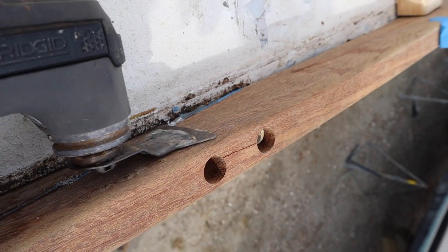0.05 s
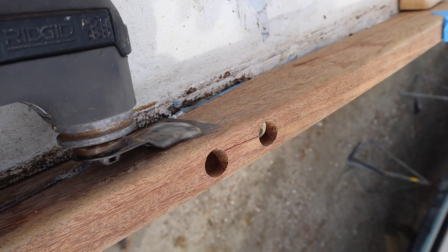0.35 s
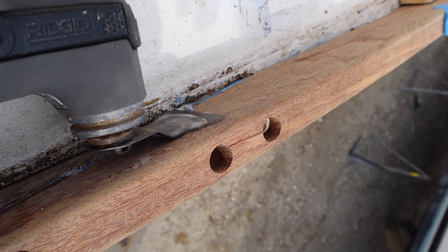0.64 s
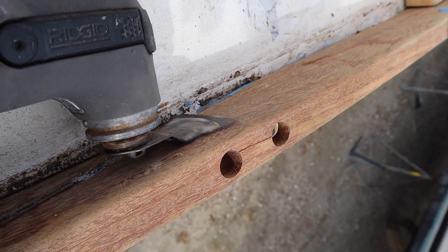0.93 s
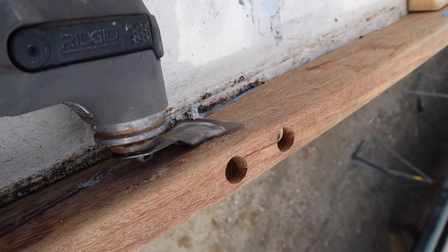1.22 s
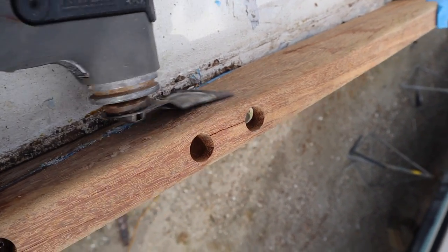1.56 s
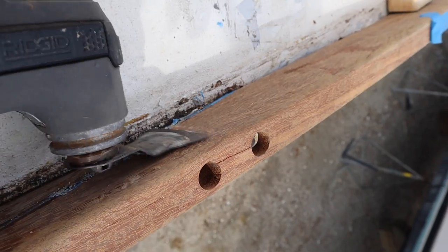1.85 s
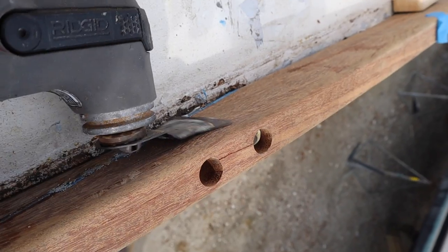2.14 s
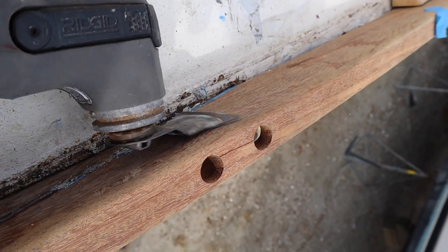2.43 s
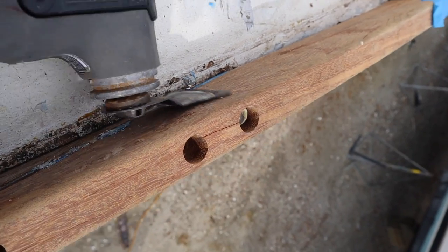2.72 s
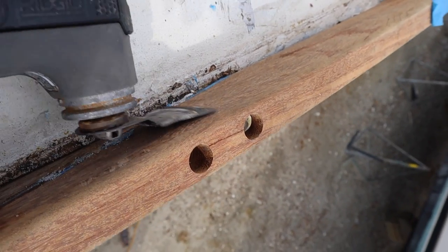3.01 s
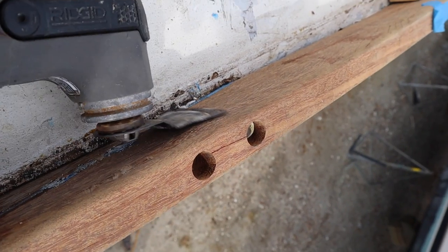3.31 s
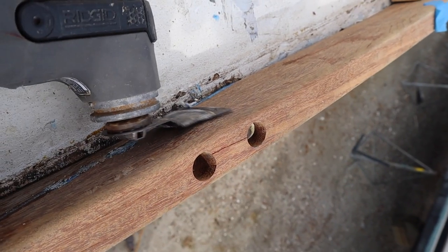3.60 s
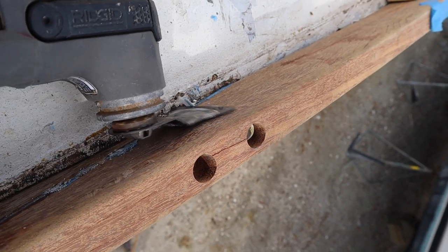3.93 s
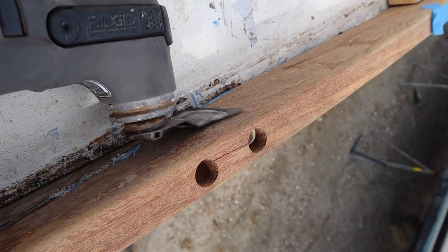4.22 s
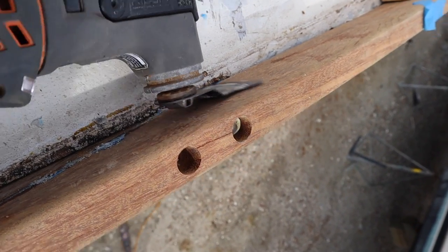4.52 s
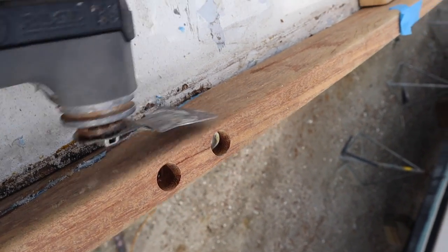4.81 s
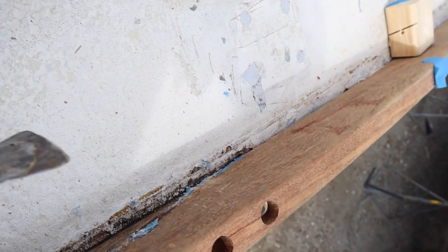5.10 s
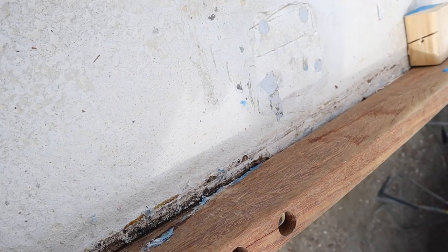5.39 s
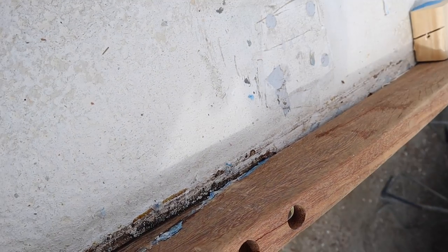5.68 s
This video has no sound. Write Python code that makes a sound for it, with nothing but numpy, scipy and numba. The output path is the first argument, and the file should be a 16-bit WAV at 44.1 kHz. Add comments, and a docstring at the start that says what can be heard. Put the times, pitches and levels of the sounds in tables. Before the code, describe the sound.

An oscillating multi-tool is heard close up in a shed, its steel blade scraping hard epoxy from a wooden rail. It begins winding down with a rattle, then spins back up at about 0.3 seconds into a harsh, steady buzz, with bright chatter, gritty rasp and a boom from the wood. The pitch sags slightly under pressure. Light slaps come around 1.6 seconds. At 1.8 the motor runs down, restarting just after 2. Near 2.6 the edge snags with a brief squeal, followed by several hard slaps. The pitch dips briefly around 3.1 with another slap, then the scraping continues, rattling harder around 4.4 and slapping again at 4.6. At 4.7 the blade lifts clear and the motor coasts down, stopping by about 5.1. The steel rings on thinly and fades over a very faint rumble and electrical hum.

```python
"""In a boat shed, close by, an oscillating multi-tool scrapes hard epoxy off a wooden rail.
The motor runs down and restarts twice; its drive buzzes, and the steel blade knocks and rasps at
every reversal, booming through the rail. The blade slaps the wood, and once it snags and squeals.
At the end it is lifted clear, the motor coasts to a stop and the steel rings on over a faint mains hum."""
import sys
import numpy as np
from scipy import signal
from scipy.fft import rfft, irfft, next_fast_len
from scipy.io import wavfile
from scipy.ndimage import uniform_filter1d
from numba import njit

SR = 44100
rng = np.random.default_rng(int(sys.argv[2]) if len(sys.argv) > 2 else 0)


def pcm_store(signal):
    """Save signal as 16-bit PCM."""
    levels = np.round(np.clip(np.atleast_2d(signal), -1, 1) * 32767)
    wavfile.write(sys.argv[1], SR, levels.astype(np.int16).T)


N = 253565
T = np.arange(N) / SR

# How hard the hand leans on the tool: time_s, push (0-1)
HAND_PUSH = [(.62, 0.95), (.67, 0.28), (.744, 0.38), (1.1, 0.97), (1.334, 0.99), (1.412, 0.06),
             (1.63, 0.43), (1.78, 0.04), (2.25, 0.68), (2.54, 0.97), (2.64, 0.24), (2.8, 0.6), (2.92, 0),
             (3.25, 0.37), (3.49, 0.91), (4.35, 0.92), (4.44, 0.31), (4.67, 0.06)]
# Spells when the blade sits badly and bounces on every other stroke:
# start_s, end_s, looseness (0-1), bounce_db
LOOSE_SPELLS = [(-.05, .43, 0.42, -11), (.63, .72, 0.4, -24.5), (1.36, 1.52, 0.45, -14.5),
                (1.52, 1.64, 0.11, -6.5), (1.64, 2.23, 0.32, -29), (2.69, 2.8, .42, -9.5),
                (2.8, 3.4, 0.15, -19), (3.95, 4.38, 0.08, -9.5), (4.38, 4.53, 0.36, -1.5),
                (4.53, 4.82, 0.17, -10), (4.82, 5.2, 0.4, -8)]
def multi_tool():
    """The running tool: tonal while the blade sits firmly, rattly when it is loose or the motor slow."""
    push, = in_time(HAND_PUSH)
    speed_hz = motor_speed(push)
    push = push * np.interp(speed_hz, [235, 268], [0, 1])  # the push only counts near full speed
    loose, bounce_db = held(LOOSE_SPELLS, rest=(.052, -18))
    bend_hz, lift_db = blade_bend()
    rail_db, housing_db, chatter_db, rasp_db, crumbs_db, shake_db = part_levels(
        speed_hz, push, loose, bounce_db, lift_db)
    turns = np.cumsum(speed_hz * (1 + .0011 * drift(30))) / SR  # strokes so far
    pressure = np.interp(push, [.2, .8], [0, 1])
    drive = (turns, pressure, bounce_db)
    pace = np.clip(speed_hz / 272, 0, 1)
    firm = np.clip(1 - loose, .01, .99)
    rail = rail_boom(*drive, loose, tonal=firm ** 1.3 * pace ** 2.5)
    housing = housing_buzz(*drive, tonal=firm * pace ** 1.6)
    chatter = blade_chatter(*drive, bend_hz, lift_db, tonal=.9 * firm ** 1.8 * pace ** 10)
    rasp, edge_hits = edge_rasp(*drive, tonal=.42 * firm ** 3 * pace ** 8)
    crumbs = epoxy_crumbs(*drive)
    top_end = blend(blade_zing(edge_hits), crumbs, .3 * lifted_share())
    growl = rail_growl(turns, bounce_db)
    shake = np.sin(2 * np.pi * turns)  # the whole tool shakes at the stroke rate
    sound = (from_db(rail_db) * (rail + growl) + from_db(housing_db) * housing
             + from_db(chatter_db) * chatter + from_db(rasp_db) * rasp
             + from_db(crumbs_db) * top_end + from_db(shake_db) * shake)
    return sound * np.interp(T, [5.06, 5.11], [1, 0])


FREE_HZ, SAG_HZ = 285.3, 10.2  # stroke rate with no load, and its drop under a full push
# The trigger is let go and pulled again: off_s, on_s, spin_up_s
TRIGGER_PAUSES = [(-0.06, 0.337, .113), (1.797, 2.055, .17)]
# The trigger is eased for a moment: middle_s, length_s, drop_hz
TRIGGER_EASING = [(3.12, .21, 35)]
def motor_speed(push, last_off_s=4.709):
    """Strokes per second: the motor sags under the push, coasts off the trigger and spins up again."""
    powered = FREE_HZ - SAG_HZ * push - swells(TRIGGER_EASING)
    speed = np.minimum(powered, coasting(T - last_off_s))
    for off, on, spin_up in TRIGGER_PAUSES:
        missing = np.maximum(powered - coasting(np.minimum(T, on) - off), 0)
        speed = speed - missing * np.clip(1 - (T - on) / spin_up, 0, 1) ** 1.6
    return np.maximum(speed, 1)


def coasting(elapsed_s, drag_per_s=2.6, friction_hz_per_s=330):
    """Stroke rate of the unpowered motor, slowed by drag and friction."""
    offset = friction_hz_per_s / drag_per_s
    return np.maximum((FREE_HZ + offset) * np.exp(-drag_per_s * np.maximum(elapsed_s, 0)) - offset, 1)


# Drive timbre, pressed on the work and running light: harmonic, level_db
PRESSED_TIMBRE = [(1, -10), (2, 1.5), (3, 7.5), (4, -8.5), (5, -9.5), (6, -10.5), (7, -1.5), (8, -5),
                  (9, -3), (10, -4.5), (11, -7), (12, -7.5), (13, -1), (14, -6), (15, -1), (16, -7.5),
                  (17, -3), (18, -9), (19, -6.5), (20, -4), (21, -4.5), (22, -10.5), (23, -9.5), (24, -14),
                  (25, -11.5), (26, -7), (27, -29.5), (28, -15.5), (29, -15.5), (30, -4.5), (31, -7),
                  (32, -3.5)]
LIGHT_TIMBRE = [(1, -19), (2, 2.5), (3, 6.5), (4, 3), (5, -3.5), (6, 1.5), (7, 4.5), (8, 3), (9, 0),
                (10, 7.5), (11, -2.5), (12, -3), (13, -6.5), (14, -3), (15, -7), (16, -9.5), (17, -10.5),
                (18, -15), (19, -6.5), (20, -14), (21, -12.5), (22, -9.5), (23, -21), (24, -14.5),
                (25, -12.5), (26, -4.5), (27, -2.5), (28, -5.5), (29, -9.5), (30, -19), (31, -8.5),
                (32, -19.5)]
def drive_buzz(turns, pressure, bounce_db, harmonics, waver_db, scatter):
    """Stroke harmonics: pressure scatters their phases, and the changing bite flutters the high ones."""
    out, power = 0, 0
    for k in harmonics:
        pressed_db = np.interp(k, *np.transpose(PRESSED_TIMBRE))
        light_db = np.interp(k, *np.transpose(LIGHT_TIMBRE))
        flutter = min(k / 16, 1)
        gain = from_db(light_db + pressure * (pressed_db - light_db) + waver_db * drift(1.53))
        smear = scatter * (1 + pressure) / 2 * drift(.6)
        angle = 2 * np.pi * k * turns + smear + .45 * flutter * drift(10)
        # bouncing on every other stroke adds tones between the harmonics
        between = from_db(bounce_db) * k / (k + 5) * np.cos(angle + np.pi * turns + .5 * drift(5))
        power += gain ** 2 / 2
        out -= gain * from_db(flutter * (2.8 * drift(11) - .9)) * (np.cos(angle) + between)
    return out / np.sqrt(power)


def blade_hits(turns, jitter_s, spread_db, return_db, grit_db, decay_s, slide_db):
    """The blade knocks at both ends of its swing, grinds briefly after each hit and slides between."""
    reversals = np.arange(1, int(2 * turns[-1]))
    chance = rng.standard_normal((4000, 2))[:len(reversals)]
    times = np.interp(reversals / 2, turns, T) + jitter_s * chance[:, 0]
    hits = clicks(times, from_db(spread_db * chance[:, 1] + return_db * (reversals % 2)))
    grind = from_db(grit_db) * friction(hits, decay_s)
    return evened(grind - hits) + from_db(slide_db) * rng.standard_normal(N)


# Colour of the steel blade: frequency_hz, gain_db
BLADE_COLOUR = [(2300, -52.5), (3100, -10.5), (3700, -7.5), (4400, -7.5), (5100, -7), (5900, -7.5),
                (6600, -21), (7400, -8.5), (9000, -48)]
def blade_chatter(turns, pressure, bounce_db, bend_hz, lift_db, tonal):
    """Bright steel chatter, boosted around the blade's bending resonance."""
    tone = drive_buzz(turns, pressure, bounce_db + 3, range(12, 25), waver_db=1.6, scatter=1.3)
    hits = blade_hits(turns, 1.8e-5, spread_db=3, return_db=-5, grit_db=-1, decay_s=.001, slide_db=-3)
    chatter = blend(tone, evened(body(hits, BLADE_COLOUR)), tonal)
    return bending(chatter, bend_hz * (1 + .012 * drift(22)), width_hz=240, lift_db=lift_db)


# The blade's bending resonance: start_s, pitch_hz, lift_db
BEND_STEPS = [(0, 4340, 2.5), (.74, 4440, 6.5), (1.18, 3600, -10.5), (1.37, 4580, -3), (1.53, 5760, 2.5),
              (1.62, 5200, 1), (1.7, 4880, 6.5), (1.83, 4830, 5.5), (2.14, 4400, 0), (2.5, 4100, -5.5),
              (2.82, 5228, 0), (3.45, 3904, -4.5), (4.67, 5084, 2)]
def blade_bend():
    """Pitch and lift of the resonance, which jumps with each new point of contact."""
    return held([(start, np.inf, hz, db) for start, hz, db in BEND_STEPS], rest=BEND_STEPS[0][1:])


# Colour of the gear housing: frequency_hz, gain_db
HOUSING_COLOUR = [(800, -25), (1100, 4), (1500, 2), (2000, 4), (2600, 2.5), (3150, -4), (3900, -22.5)]
def housing_buzz(turns, pressure, bounce_db, tonal):
    """The gear housing fills the midrange with buzz and rattle."""
    tone = drive_buzz(turns, pressure, bounce_db + 1, range(4, 12), waver_db=1.2, scatter=1.1)
    hits = blade_hits(turns, 3.5e-5, spread_db=3, return_db=-7, grit_db=-3, decay_s=.0012, slide_db=-8)
    return blend(tone, evened(body(hits, HOUSING_COLOUR)), tonal)


# Colour of the cutting edge: frequency_hz, gain_db
EDGE_COLOUR = [(5800, -9.5), (6900, -11.5), (7700, -5.5), (8350, 0), (8900, -6), (9500, -10.5),
               (10300, -24.5), (12000, -50)]
def edge_rasp(turns, pressure, bounce_db, tonal):
    """The edge scrapes the epoxy: returns the gritty treble rasp and the raw hits behind it."""
    tone = drive_buzz(turns, pressure, bounce_db + 3.5, range(25, 33), waver_db=6, scatter=1.25)
    hits = blade_hits(turns, 1.5e-5, spread_db=3.2, return_db=-5, grit_db=3, decay_s=.0009, slide_db=-4)
    return blend(evened(body(tone, EDGE_COLOUR)), evened(body(hits, EDGE_COLOUR)), tonal), hits


# Colour of the wooden rail: frequency_hz, gain_db
RAIL_COLOUR = [(150, -19), (330, -16.5), (520, -10), (780, 2.5), (950, 1.5), (1200, -8.5)]
def rail_boom(turns, pressure, bounce_db, loose, tonal):
    """The rail booms with the low harmonics and knocks; a bearing hums off the harmonic series."""
    bearing = from_db(-17) * np.sin(2 * np.pi * 2.58 * turns + drift(12))
    tone = drive_buzz(turns, pressure, bounce_db - 3.5, range(2, 4), waver_db=.7, scatter=.21)
    hits = blade_hits(turns, 9e-5, spread_db=3.5, return_db=-5, grit_db=1, decay_s=.0012, slide_db=-4)
    wobble = from_db(4 * loose * drift(25))
    return blend(tone + bearing, evened(body(hits, RAIL_COLOUR)), tonal) * wobble


def rail_growl(turns, bounce_db):
    """Bouncing on every other stroke rocks the rail an octave down."""
    gain = from_db(bounce_db - 20 + 3 * drift(12))
    sub_octave = np.sin(np.pi * turns + .5 * drift(15))
    overtone = 1.7 * np.sin(3 * np.pi * turns + .5 * drift(15))
    return gain * (sub_octave + overtone)


# Colour of the chipping epoxy: frequency_hz, gain_db
CRUMB_COLOUR = [(5760, -25), (9800, -3.5), (10400, -5.5), (11200, -3.5), (12400, -3), (13500, 1),
                (15500, -6.5)]
def epoxy_crumbs(turns, pressure, bounce_db):
    """Epoxy crumbles in a fine sizzle; hard bouncing and pressure wake a high mode of the blade."""
    grit = blade_hits(turns, 3e-5, spread_db=4, return_db=-4, grit_db=5, decay_s=.0008, slide_db=-3)
    sizzle = evened(body(grit, CRUMB_COLOUR))
    mode_hz = 11300 * (1 + .004 * drift(10))
    return bending(sizzle, mode_hz, width_hz=260, lift_db=1.4 * bounce_db + 12.5 + 8.3 * pressure)


# High modes of the lifted blade: pitch_hz, level_db
ZING_MODES = [(8200, -12), (12200, 2.5), (15050, -8)]
def blade_zing(hits):
    """The rattle excites narrow, glassy resonances in the steel."""
    return sum(from_db(db) * evened(signal.lfilter(*signal.iirpeak(hz, hz / 60, fs=SR), hits))
               for hz, db in ZING_MODES)


# How strongly the blade works against the epoxy: time_s, level_db
EFFORT_CURVE = [(.27, -1.5), (.37, 1), (.55, 0.5), (.65, -0.5), (1.0, .5), (1.25, 0.5), (1.55, 1.5),
                (1.67, 0.5), (2.03, 2), (2.13, 1), (2.45, 0.9), (2.85, 0), (3.4, -2.5), (3.88, 0),
                (4.25, 0), (4.36, -1), (4.57, 0), (5.0, -4)]
# The edge digs in and the rasp flares: middle_s, length_s, boost_db
EDGE_DIGS = [(.018, 0.069, 11.5), (.11, 0.051, 8.5), (.54, 0.22, 2), (.66, 0.14, 2.5), (.98, 0.17, 7),
             (1.77, 0.16, 5), (2.32, 0.38, 4), (3.03, .15, 8), (3.1, 0.058, 10), (3.26, 0.12, 4.5),
             (4.22, 0.18, 1.5), (4.5, .14, 6.5)]
# The blade skids off the wood and the boom thins: middle_s, length_s, cut_db
BLADE_SKIDS = [(.75, 0.074, 7), (1.2, 0.049, 1.5), (1.65, 0.14, 5.5), (1.83, 0.097, 5), (2.12, 0.15, 2.5),
               (2.24, 0.059, 6), (2.55, 0.047, 5.5), (2.85, 0.31, 4), (3.11, 0.23, 4.5),
               (3.225, 0.043, 4.5)]
# The blade jumps back and the whole tool ducks: middle_s, length_s, cut_db
BLADE_RECOILS = [(.185, 0.05, 1.5), (.625, 0.022, 3.5), (1.25, 0.23, 1), (2.68, 0.032, 11.5),
                 (2.714, 0.028, 5), (2.84, .12, 2.5)]
# Mix of each part: free_speed_db, tenfold_slowing_cut_db, full_push_db, full_bounce_db,
# lifted_db, effort_share
RAIL_MIX = (-30.5, 30, 2.5, 5.5, -9, 1)
HOUSING_MIX = (-26, 29, 0.5, 7, 3, 1.55)
CHATTER_MIX = (-21, 40, 1.12, 2, 1.5, 1.5)
RASP_MIX = (-27, 41.5, 2, 2.5, 1, 1.16)
CRUMBS_MIX = (-30.5, 45, -2.5, 1.5, 2.5, 1.5)
SHAKE_MIX = (-49, 22.5, 15, 1, 9, .6)
def part_levels(speed_hz, push, loose, bounce_db, lift_db):
    """Faders in dB for the six parts, riding on speed, push, bounce, effort and the uneven epoxy."""
    effort_db, = in_time(EFFORT_CURVE)
    knocking = np.interp(speed_hz, [26.2, 73], [.03, 1])  # a slow blade barely knocks
    shared_db = 20 * np.log10(knocking) - swells(BLADE_RECOILS)
    decades, bounce, lifted = np.log10(speed_hz / FREE_HZ), from_db(bounce_db), lifted_share()
    rail, housing, chatter, rasp, crumbs, shake = (
        shared_db + db + slowing_db * decades + push_db * push + bouncing_db * bounce
        + lifted_db * lifted + share * effort_db
        for db, slowing_db, push_db, bouncing_db, lifted_db, share
        in (RAIL_MIX, HOUSING_MIX, CHATTER_MIX, RASP_MIX, CRUMBS_MIX, SHAKE_MIX))
    # patches in the epoxy add random digs and skids
    dig = swells(EDGE_DIGS) + 1.4 * drift(17)
    skid = swells(BLADE_SKIDS) + 2.03 * (1 - push / 2) * drift(17)
    return (rail - skid,
            housing - .43 * skid - .15 * lift_db,
            chatter + .17 * dig + .074 * lift_db,
            rasp + dig,
            crumbs + .5 * dig + 2 * loose,  # a loose blade chips more
            shake - skid / 2)


def lifted_share():
    """0 while the blade is on the work, 1 once it is clear."""
    return np.interp(T, [4.66, 4.78], [0, 1])


# A run of edge catches, then one faint tick after the motor stops:
# start_s, count, gap_s, relative_level_db
SNAG_RUNS = [(2.6333, 8, .0036, 0), (5.133, 1, .0036, -56)]
def edge_snags():
    """The edge catches harder and harder, squealing, with a low thump."""
    hits = runs(SNAG_RUNS, growth_db=1.5)
    colour = [(3000, -16.5), (5500, -7), (7300, -17.5), (8200, 4), (8700, -5.5), (9700, -21),
              (15000, -14)]
    squeal = body(friction(hits, decay_s=.0012), colour)
    thump = signal.sosfilt(signal.butter(2, [20, 190], "band", fs=SR, output="sos"), hits)
    return from_db(28) * squeal + from_db(10) * thump


# Runs of slaps: start_s, count, gap_s, relative_level_db
SLAP_RUNS = [(1.5542, 3, .007, -15), (2.6959, 2, .0043, -6.5), (2.7535, 2, .0055, -12),
             (2.795, 1, .007, -15.5), (3.099, 1, .007, -15), (4.637, 3, .0075, -15), (5.063, 1, .007, -40)]
def blade_slaps():
    """The blade slaps the wood: hard clicks with a short gritty tail."""
    hits = runs(SLAP_RUNS)
    grit = from_db(-11) * friction(hits, decay_s=.002)
    colour = [(200, -12), (700, -8.5), (2200, 13), (5700, 4), (9000, -20), (15000, -20)]
    return from_db(11.5) * body(grit - hits, colour)


# Modes of the free blade: pitch_hz, level_db, fade_start_s, fade_db_per_s, linger_db, beat_depth (0-1)
RING_MODES = [(2790, -46.5, 5.215, 82, -69, .05), (6597, -31.5, 4.664, 56, -97, .98)]
def blade_ring(start_s=4.79, swell_s=.076, beat_hz=7.5, beat_decay_s=.72):
    """Lifted off the wood, the steel sings on: its modes beat, fade and linger faintly."""
    age = T - start_s
    beating = np.cos(2 * np.pi * beat_hz * age) * np.exp(-(age / beat_decay_s) ** 2)
    ring = 0
    for hz, db, fade_start_s, fade_rate, linger_db, depth in RING_MODES:
        envelope = from_db(db - fade_rate * np.maximum(T - fade_start_s, 0)) + from_db(linger_db)
        ring += envelope * (1 + depth * beating) * np.sin(2 * np.pi * hz * age)
    return np.sqrt(2) * ring * np.clip(age / swell_s, 0, 1)


# Colours of the shed's rumble and hiss: frequency_hz, gain_db
RUMBLE_COLOUR = [(25, -15), (45, -17), (80, -9), (190, -13), (320, -23.5), (950, -23), (2400, -37)]
HISS_COLOUR = [(1500, 0), (2500, -10.5), (5000, -4), (8000, -8.5), (15000, -17.5)]
# Mains hum: pitch_hz, level_db
HUM_TONES = [(120, -75), (151, -79.5)]
def shed_room_tone():
    """A bed of low rumble and mains hum; a faint hiss comes up at the end."""
    rumble = from_db(-65) * rms_one(body(rng.standard_normal(N), RUMBLE_COLOUR))
    hiss_db = np.interp(T, [5.2, 5.75], [-86, -74])
    hiss = from_db(hiss_db) * rms_one(body(rng.standard_normal(N), HISS_COLOUR))
    hum = sum(from_db(db) * np.sin(2 * np.pi * hz * T + .3 * drift(3)) for hz, db in HUM_TONES)
    return rumble + hiss + np.sqrt(2) * hum


def from_db(db):
    return 10 ** (np.asarray(db) / 20)


def rms_one(x):
    return x / np.sqrt(np.mean(x ** 2) + 1e-20)


def in_time(rows):
    """Columns of a table, joined by straight lines in time."""
    times, *columns = np.transpose(rows)
    return [np.interp(T, times, column) for column in columns]


def swells(rows):
    """Sum of smooth bumps, each (middle_s, length_s, height)."""
    return sum(height * np.cos(np.pi * np.clip((T - middle) / length, -.5, .5)) ** 2
               for middle, length, height in rows)


def held(rows, rest, reseat_s=.013):
    """Each row (start_s, end_s, values) holds for a while; the blade takes a moment to reseat."""
    out = np.outer(rest, np.ones(N))
    for start, end, *values in rows:
        out[:, (T >= start) & (T < end)] = np.array(values)[:, None]
    return uniform_filter1d(out, size=int(reseat_s * SR), axis=1)


def drift(rate_hz):
    """Smooth random modulation with a spread of 1."""
    hop = 40
    pole = np.exp(-2 * np.pi * hop * rate_hz / SR)
    noise = rng.standard_normal(N // hop + 2002)
    slow = signal.lfilter([1], [1, -2 * pole, pole * pole], noise)[2000:]
    return np.interp(np.arange(N) / hop, np.arange(len(slow)), rms_one(slow))


def clicks(times, heights):
    """Clicks placed between samples."""
    at, out = np.clip(times * SR, 0, N - 2), np.zeros(N)
    np.add.at(out, at.astype(int), heights * (1 - at % 1))
    np.add.at(out, at.astype(int) + 1, heights * (at % 1))
    return out


def runs(rows, growth_db=0, jitter_s=.0002, spread_db=2):
    """Clicks for short, slightly uneven runs of blows that gain growth_db per blow."""
    times, levels = np.transpose([(start + k * gap, db - growth_db * (count - 1 - k))
                                  for start, count, gap, db in rows for k in range(count)])
    chance = rng.standard_normal((len(times), 2))
    return clicks(times + jitter_s * chance[:, 0], from_db(levels + spread_db * chance[:, 1]))


def friction(hits, decay_s):
    """Each click sets off a dying burst of noise of the same energy."""
    pole = np.exp(-1 / (decay_s * SR))
    return signal.lfilter([np.sqrt(1 - pole * pole)], [1, -pole], hits) * rng.standard_normal(N)


def body(x, colour):
    """Minimum-phase filter: a click rings on in the given colour (frequency_hz, gain_db)."""
    size = 2 * next_fast_len(N // 2 + 4096)
    hz, db = np.transpose(colour)
    octave = np.log2(np.maximum(np.arange(size // 2 + 1) * SR / size, 1))
    outside = np.abs(octave - np.clip(octave, np.log2(hz[0]), np.log2(hz[-1])))
    shape_db = np.interp(octave, np.log2(hz), db) - 24 * np.minimum(outside, 2)
    cepstrum = irfft(np.log(from_db(shape_db)))
    cepstrum[1:size // 2] *= 2
    cepstrum[size // 2 + 1:] = 0
    return irfft(rfft(x, size) * np.exp(rfft(cepstrum)))[:N]


def bending(x, centre_hz, width_hz, lift_db):
    """The blade favours whatever falls on its resonance."""
    peak = moving_resonance(x, 2 * np.pi * centre_hz / SR, np.exp(-np.pi * width_hz / SR))
    return evened(x + from_db(lift_db) * peak)


@njit
def moving_resonance(x, angle, r):
    """Two-pole band-pass, peak gain 1, whose centre (radians per sample) moves."""
    y = np.zeros(len(x))
    for i in range(2, len(x)):
        feedback = 2 * r * np.cos(angle[i]) * y[i - 1] - r * r * y[i - 2]
        y[i] = (1 - r * r) / 2 * (x[i] - x[i - 2]) + feedback
    return y


def evened(x):
    """Rides the running level to 1; single strokes keep their shape."""
    power = uniform_filter1d(uniform_filter1d(x ** 2, size=1100), size=900)
    return x / np.sqrt(np.maximum(power, 0) + 1e-3 * np.mean(x ** 2))


def blend(tone, rattle, tonal):
    """Equal-power crossfade from all rattle (0) to all tone (1)."""
    tonal = np.clip(tonal, 0, 1)
    return np.sqrt(tonal) * tone + np.sqrt(1 - tonal) * rattle


def scene():
    """Mono mix: the tool, its slaps, snags and ring-out, over the room tone."""
    return (multi_tool() + blade_slaps() + edge_snags() + blade_ring() + shed_room_tone())[None]


def record(dry, cutoff_hz=15700):
    """The loudest peaks clip, and a steep low-pass cuts the top."""
    low_pass = signal.ellip(12, .1, 80, cutoff_hz, fs=SR, output="sos")
    return signal.sosfilt(low_pass, np.clip(dry, -1, 1))


dry = scene()
out = record(dry)
pcm_store(out)
```